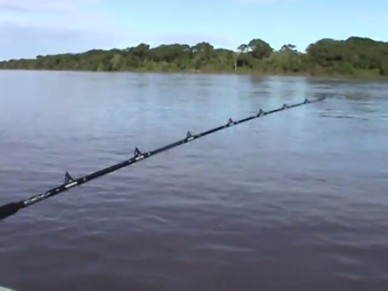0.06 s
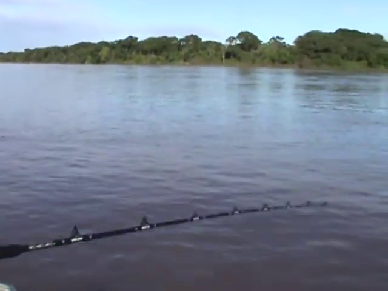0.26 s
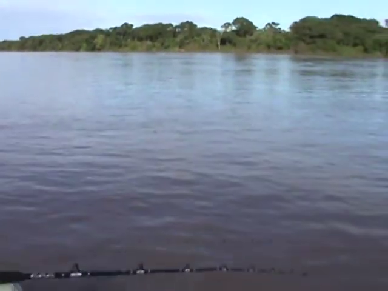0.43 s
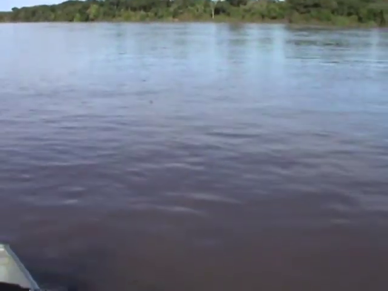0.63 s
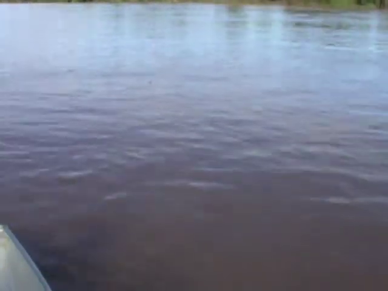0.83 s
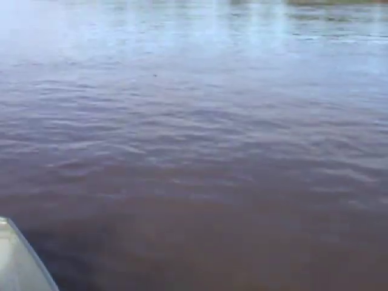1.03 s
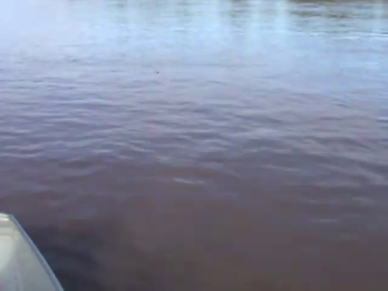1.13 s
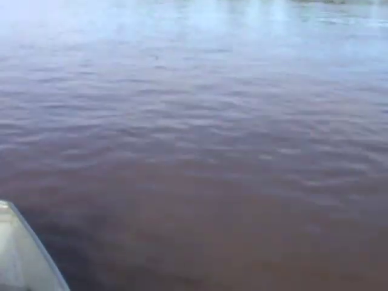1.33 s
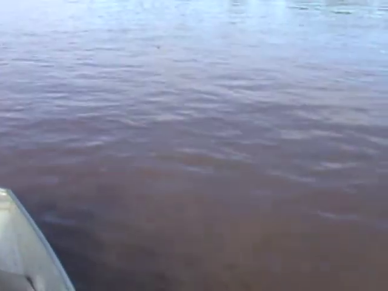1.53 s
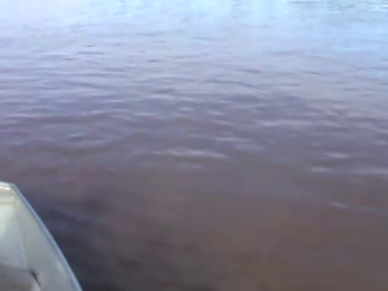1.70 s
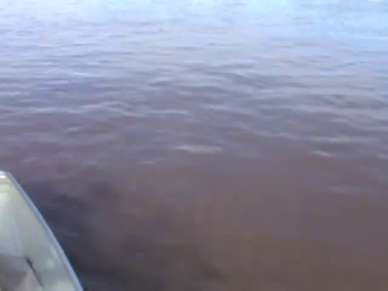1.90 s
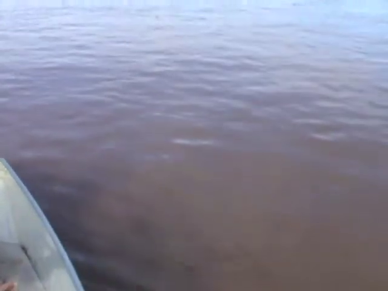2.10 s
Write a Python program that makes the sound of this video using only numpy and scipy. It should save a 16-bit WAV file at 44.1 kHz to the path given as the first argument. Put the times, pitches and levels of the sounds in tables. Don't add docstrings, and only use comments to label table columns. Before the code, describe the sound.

A fishing reel's drag clicker buzzes in uneven surges, slows to separate ticks, then a lever snaps shut. Water laps and gurgles at the boat hull, with faint bird chirps and river hiss, heard close in stereo.

```python
import sys
import numpy as np
from scipy import signal
from scipy.fft import rfft, irfft
from scipy.io import wavfile
from scipy.ndimage import uniform_filter1d, minimum_filter1d

SR = 44100
rng = np.random.default_rng(int(sys.argv[2]) if len(sys.argv) > 2 else 0)


def volts_from_db(level):
    exponent = np.asarray(level, float) / 20
    return 10 ** exponent


def generate_wav(signal):
    frames = np.transpose(np.atleast_2d(signal))
    scaled = np.clip(frames, -1, 1) * 32767
    pcm = np.round(scaled).astype(np.int16)
    wavfile.write(sys.argv[1], SR, pcm)


N = 94815

# (frequency [Hz], difference [dB])
REEL_LEAN = [(500, 4), (2000, 1), (3300, 4.5), (6000, 3.5), (8000, 4.5), (11000, -4.5), (12500, 10.5),
             (15000, 11)]
# (frequency [Hz], likeness [0-1])
REEL_SAME = [(500, 0.15), (1500, 0.63), (3300, 1), (6000, 0.67), (9500, 0.6), (14000, 0.29)]
# (frequency [Hz], likeness [0-1])
AMBIENT_SAME = [(60, 0.95), (150, 0.62), (350, 0.7), (900, 0.6), (3770, 0.4), (15000, 0.5)]
# (frequency [Hz], difference [dB])
AMBIENT_LEAN = [(60, 1), (240, 0.11), (950, 0.5), (3770, 2.9), (15000, 0.35)]


def evened(x):
    return x / np.sqrt(np.mean(x ** 2) + 1e-20)


def read(points, hz):
    f, value = np.transpose(points)
    return np.interp(np.log(hz + 1), np.log(f + 1), value)


def add(mix, s, sound):
    part = mix[..., round(s * SR):][..., :sound.shape[-1]]
    part += sound[..., :part.shape[-1]]


def ring(x, hz, width_hz):
    return signal.lfilter(*signal.iirpeak(hz, hz / min(width_hz, SR / 3), SR), x)


def sway(x, hz, width_hz):
    turn = np.exp(2j * np.pi * np.cumsum(hz) / SR)
    r = np.exp(-np.pi * width_hz / SR)
    return 2 * (turn * signal.lfilter([1 - r], [1, -r], x / turn + 1e-18)).real


def colour(x, db_points):
    return irfft(rfft(x) * volts_from_db(read(db_points, np.fft.rfftfreq(N, 1 / SR))), N)


def ports(a, b, same, lean):
    hz = np.fft.rfftfreq(N, 1 / SR)
    likeness = np.clip(read(same, hz), 0, 1)
    side = np.array([[1], [-1]])
    z = np.sqrt((1 + likeness) / 2) * rfft(a) + side * np.sqrt((1 - likeness) / 2) * rfft(b)
    return irfft(z * volts_from_db(side * read(lean, hz) / 2), N)


def burst(rise_s, die_s):
    t = np.arange(-3 * rise_s, 8 * die_s, 1 / SR)
    return np.where(t < 0, np.exp(-(t / rise_s) ** 2), np.exp(-t / die_s))


def air():
    # (frequency [Hz], density [dB per Hz])
    hiss_spectrum = [(15, -50), (25, -13), (299, -15), (542, -65), (620, -11), (749, -34), (1280, -26),
                     (1470, -15.5), (15800, -26.5)]
    # (frequency [Hz], level [dB], wander [Hz])
    hum_lines = [(36, -69, 5.5), (81.8, -65, 4.6), (206.7, -74, 3.73)]
    hiss = evened(colour(rng.standard_normal((2, N)), hiss_spectrum))
    out = volts_from_db(-59.5) * ports(*hiss, AMBIENT_SAME, AMBIENT_LEAN)
    for hz, db, wander_hz in hum_lines:
        slow = uniform_filter1d(uniform_filter1d(rng.standard_normal((2, N)), 2500), 2500)
        level_drift, pitch_drift = evened(slow)
        phase = 2 * np.pi * np.cumsum(hz + wander_hz * pitch_drift) / SR
        out += np.sqrt(2) * volts_from_db(db + 2.0 * level_drift) * np.sin(phase)
    return out


def water():
    # (time [s], level [dB])
    laps = [(0, -49), (.13, -60.5), (.19, -63), (.48, -51.5), (.75, -55.5), (1.18, -58), (1.41, -50),
            (1.7, -55.5), (1.88, -56.5), (1.95, -65.5), (2.03, -60), (2.15, -60.5)]
    # (frequency [Hz], gain [dB])
    hull = [(330, 0), (540, -1), (820, 5), (1100, 2)]
    bubbles_per_s, slosh_db, lap_db = 260, -1.5, -4
    size = volts_from_db(-0.5 * np.minimum(rng.exponential(1, N), 4)) * (rng.random(N) < bubbles_per_s / SR)
    kind = rng.integers(0, 32, N)
    out = np.zeros((2, N))
    for k, hz in enumerate(np.geomspace(272.2, 1201, 32)):
        turns = np.arange(0, 30 / hz, 1 / SR) * hz
        shape = np.minimum(turns, 1) * np.exp(-turns / 18.0)
        bubble = shape * np.sin(2 * np.pi * turns * (1 + 0.00538 * turns))
        out[k % 2] += signal.oaconvolve(size * (kind == k), bubble)[:N]
    gurgle = evened(np.array([out[0] + out[1], out[0] - out[1]]))
    slosh = evened(ring(ring(rng.standard_normal((2, N)), 440, 1800), 740, 4700))
    both = gurgle + volts_from_db(slosh_db) * slosh
    level = volts_from_db(lap_db + np.interp(np.arange(N) / SR, *np.transpose(laps)))
    return ports(*(colour(both, hull) * level), AMBIENT_SAME, AMBIENT_LEAN)


def hisses():
    # (start [s], length [s], level [dB], centre [Hz], width [Hz])
    swells = [
        (0, .13, -63.5, 4080, 4800),
        (1.488, 0.3, -63.5, 1950, 120),
        (1.987, 0.12, -62, 1270, 160),
        (2.063, 0.091, -61.5, 8400, 3500),
    ]
    out = np.zeros((2, N))
    for s, length, db, hz, width in swells:
        noise = rng.standard_normal((2, SR // 2))
        band = evened(ring(ring(noise, hz, width), hz, width))[:, :round(length * SR)]
        add(out, s, volts_from_db(db) * band * np.sin(np.linspace(0, np.pi, band.shape[1])))
    return ports(*out, AMBIENT_SAME, AMBIENT_LEAN)


def chirps():
    # (start [s], length [s], level [dB], start pitch [Hz], end pitch [Hz])
    whistles = [(0, 0.019, -54, 4400, 2730), (1.576, 0.014, -61.5, 3600, 3200),
                (1.609, 0.016, -57.5, 3700, 3080), (1.76, 0.029, -59, 3800, 2940),
                (1.919, 0.021, -58, 3200, 3700), (1.931, 0.032, -56.5, 3700, 2920),
                (2.105, 0.039, -55.5, 3450, 3040), (1.3, 0.065, -52, 1450, 950),
                (1.71, 0.013, -58, 4940, 2640), (1.744, 0.019, -62, 3400, 4000),
                (2.126, 0.0136, -67, 2930, 2000), (1.995, 0.015, -56, 2360, 1890),
                (2.053, 0.018, -61, 3300, 3050)]
    out = np.zeros(N)
    for s, length, db, start_hz, end_hz in whistles:
        u = np.arange(0, length, 1 / SR) / length
        wobble, warble = evened(uniform_filter1d(rng.standard_normal((2, 4000)), 70))[:, :len(u)]
        hz = (start_hz + (end_hz - start_hz) * u ** 1.63) * (1 + .022 * warble)
        shape = (1 + .45 * wobble) * np.sqrt(np.sin(np.pi * u))
        add(out, s, volts_from_db(db) * shape * np.sin(2 * np.pi * np.cumsum(hz) / SR))
    return out * volts_from_db(np.array([[1.5], [-1.5]]))


def knocks():
    # (time [s], peak [dB], centre [Hz], width [Hz], decay [s])
    blows = [(.0085, -43, 1600, 500, .002), (.166, -49, 2200, 500, .003), (1.3856, -38, 4000, 4000, .001),
             (1.3871, -24, 9000, 12000, .0008), (1.3872, -23, 4100, 2400, .0008),
             (1.3895, -30, 4000, 4000, .006), (1.399, -24, 4200, 5000, .004),
             (1.401, -28, 10000, 12000, .004), (1.4011, -29, 1500, 1200, .004),
             (1.4012, -20, 2900, 1500, .002), (1.4035, -29, 810, 400, .004),
             (1.4042, -20, 2250, 900, .0025), (1.4040, -30, 8800, 2500, .003),
             (1.4100, -34, 2600, 3000, .008), (1.4755, -43, 3100, 900, .0015),
             (1.4770, -46, 1600, 500, .002), (1.726, -42, 2300, 400, .003), (1.730, -41, 3500, 1200, .002),
             (1.735, -48, 4700, 700, .003), (1.736, -45, 2700, 400, .003), (1.749, -48, 1700, 400, .004)]
    ring_s, ring_hz, ring_db, ring_t60_s, ring_stop_s = 1.406, 7080, -50, .35, .066
    grit = 2.2
    out = np.zeros((2, N))
    for s, db, hz, width, die in blows:
        shape = burst(0.00031, die)
        tone = np.cos(2 * np.pi * hz * np.arange(len(shape)) / SR)
        clean = tone * (width < hz / 2) * [[1], [0]]
        noise = rng.standard_normal((2, 4000))[:, :len(shape)]
        blow = ring(ring((clean + grit * noise) * shape, hz, width), hz, 2 * width)
        add(out, s - .0012, volts_from_db(db) * blow / abs(blow[0]).max())
    t = np.arange(0, ring_stop_s, 1 / SR)
    shape = np.clip(np.minimum(t, ring_stop_s - t) / 0.0044, 0, 1)
    decay = volts_from_db(ring_db - 60 * t / ring_t60_s)
    add(out[0], ring_s, shape * decay * np.sin(2 * np.pi * ring_hz * t))
    return ports(*out, REEL_SAME, REEL_LEAN)


def teeth(slip_s):
    # (time [s], rate [teeth per s])
    spool = [(0.2056, 39.9), (0.266, 85.2), (0.308, 90.0), (0.327, 76.9), (0.362, 86.6), (0.405, 137.6),
             (0.428, 143.1), (0.472, 57.5), (0.532, 117.8), (0.592, 36.8), (0.646, 74.1), (0.678, 82.4),
             (0.733, 71.8), (0.8, 110.1), (0.869, 32.1), (0.909, 91.7), (0.937, 102.2), (1.015, 27.0)]
    # (time [s], peak [dB], shine [dB])
    stall = [(1.0352, -22.5, -2), (1.0648, -24.5, -1.5), (1.0957, -24.5, -2.5), (1.1313, -24.5, -7),
             (1.1662, -24.5, -1), (1.192, -25.5, 1), (1.2128, -24, -4), (1.2324, -25.5, 0),
             (1.2491, -29, 3.5), (1.2668, -27, 1), (1.2867, -25.5, -1.5), (1.319, -23.5, -4)]
    # (time [s], peak [dB], shine [dB])
    strays = [(.5, -26, 0.5), (0.617, -40, -9), (0.664, -40.5, 18.5), (0.715, -38, -8), (0.742, -34, 0),
              (0.855, -38.5, -8), (0.877, -43, -11), (0.995, -44, 8), (1.0436, -38, -2), (1.054, -46.5, 7),
              (1.0752, -43, 9), (1.084, -51, -5), (1.1505, -53, 5), (1.177, -52, 3), (1.1876, -34, -3),
              (1.2035, -58, 13), (1.222, -48, 9), (1.33, -35.5, -9), (1.342, -48, -6)]
    # (time [s], level [dB], facing [0-1], shine [dB])
    force = [(.204, -37.5, 0.43, -2.5), (.36, -37, 0.7, -7.5), (.45, -37, 0.61, -0.5),
             (.55, -38, 0.81, 0.5), (.7, -37, 0.67, -3.9), (.85, -37.5, 0.59, 0),
             (0.949, -35.5, 0.91, -5.5), (1.012, -42, 0.93, 3)]
    stall_facing, stall_db, force_gain_db = 0.15, -5.5, 6.5
    s, rate = np.transpose(spool)
    t = np.arange(s[0], s[-1], 1 / SR)
    speed = np.interp(t, s, rate)
    at = np.r_[0, np.flatnonzero(np.diff(np.floor(np.cumsum(speed) / SR)))]
    when, force_db, facing, shine_db = np.transpose(force)
    db = np.interp(t[at], when, force_db) + force_gain_db - 0.22 * 10 * np.log10(speed[at] / 80)
    slow_s, slow_db, slow_shine_db = np.transpose(stall + strays)
    all_facing = np.r_[np.interp(t[at], when, facing), stall_facing + 0 * slow_s]
    all_shine_db = np.r_[np.interp(t[at], when, shine_db), slow_shine_db]
    return (np.r_[t[at], slow_s + slip_s], np.r_[db, slow_db + stall_db],
            np.clip(all_facing, 0, 1), all_shine_db)


def drag():
    # (frequency [Hz], width [Hz], level facing [dB], level turned away [dB])
    body = [(916, 114, -15.5, -16), (1534, 220, -8, -45), (2126, 32, -7, -6.5), (2740, 200, 3.5, -76),
            (3229, 356, 6, -11), (4065, 310, -14, -3), (4623, 1100, -8.5, -9.5), (5580, 980, -12.5, -9.5),
            (7670, 2700, -8.5, -18), (8673, 400, -2, -8), (9725, 2260, -3.5, -9.5), (13700, 400, -24, -17),
            (14500, 180, -8, -23)]
    # (frequency [Hz], density [dB per Hz])
    crack_spectrum = [(500, -52), (1940, 1), (2520, -5), (3270, -4.5), (3780, -6), (10500, -14.5),
                      (14700, -23), (15900, -43)]
    slip_s, die_s, rattle_s, rattle_db = .0012, .0017, 0.0074, -7.5
    bounce_s, bounce_spread_s, bounce_db, bounce_spread_db = 0.0035, 0.001, -10.5, 2.5
    clean_db, grit_db, crack_db, snap_back_db = -11.5, -11, 2, -3
    tooth_spread_db, mode_spread_db, detune_widths = 0.73, 1.11, .3
    shine_hz, dull_db_per_khz = 7560, -0.88

    s, db, facing, shine_db = teeth(slip_s)
    luck = rng.standard_normal((120, 2 * len(body) + 3))[:len(s)]
    at = np.round((s - 3 * slip_s) * SR).astype(int)
    late = at + np.round(abs(bounce_s + bounce_spread_s * luck[:, -2]) * SR).astype(int)
    size = volts_from_db(db + tooth_spread_db * luck[:, -1])
    shape = burst(slip_s, die_s)
    grit = rng.standard_normal((2, N))
    order = np.argsort(at)
    latest = order[np.maximum(np.searchsorted(at[order], np.arange(N)) - 1, 0)]

    def struck(gains, hz=0):
        dull = volts_from_db(dull_db_per_khz * hz / 1000)
        rattle = dull * volts_from_db(rattle_db) * burst(slip_s, rattle_s)
        rattle[:len(shape)] += shape[:len(rattle)]
        train = np.zeros(N)
        train[at] += gains
        train[late] += gains * dull * volts_from_db(bounce_db + bounce_spread_db * luck[:, -3])
        noisy = signal.oaconvolve(train, rattle)[:N] * grit
        if not hz:
            return noisy
        tone = shape * np.cos(2 * np.pi * hz * np.arange(len(shape)) / SR)
        blow = signal.oaconvolve(train, tone)[:N]
        return volts_from_db(grit_db) * noisy + volts_from_db(clean_db) * np.array([blow, 0 * blow])

    low, high = (signal.butter(2, shine_hz, kind, fs=SR) for kind in ("low", "high"))
    snap = np.zeros(N)
    snap[at] = size * volts_from_db(shine_db)
    snap[late] += size * volts_from_db(shine_db + snap_back_db)
    bright = signal.oaconvolve(snap, shape)[:N] * grit
    crack = signal.lfilter(*low, struck(size)) + signal.lfilter(*high, bright)
    out = volts_from_db(crack_db) * colour(crack, crack_spectrum)
    for k, (hz, width, near_db, away_db) in enumerate(body):
        mode_db = away_db + (near_db - away_db) * facing
        mode_db = mode_db + mode_spread_db * (0.65 + 2.4 * hz / shine_hz) * luck[:, k]
        gains = size * volts_from_db(mode_db + (hz > shine_hz) * shine_db)
        mode_hz = hz + detune_widths * width * np.tanh(luck[latest, len(body) + k])
        out += 4.73 * sway(struck(gains, hz), mode_hz, width)
    out = signal.sosfilt(signal.butter(4, 600, "high", fs=SR, output="sos"), out)
    return ports(*out, REEL_SAME, REEL_LEAN)


def scene():
    return drag() + knocks() + chirps() + hisses() + water() + air()


def top_cut(x):
    return signal.sosfilt(signal.butter(12, 16640, fs=SR, output="sos"), x)


def record(dry):
    mask_db, mask_hz = -28.5, 5000
    dry = signal.oaconvolve(dry, signal.firwin(255, 15750, fs=SR)[None], "same")
    hz, _, z = signal.stft(dry, SR, nperseg=128)
    power = (abs(z) ** 2).sum(0)
    power = uniform_filter1d(uniform_filter1d(power, size=4, axis=0), size=2, axis=1)
    loud = -minimum_filter1d(minimum_filter1d(-power, size=13, axis=1), size=9, axis=0)
    kept = (power > loud * volts_from_db(2 * mask_db)) | (hz[:, None] < mask_hz)
    mix = signal.istft(z * kept, SR, nperseg=128)[1][:, :N]
    return top_cut(mix)


dry = scene()
out = record(dry)
generate_wav(out)
```